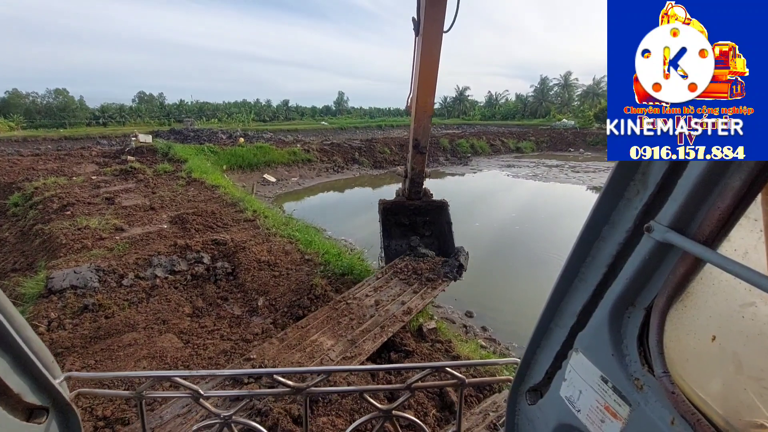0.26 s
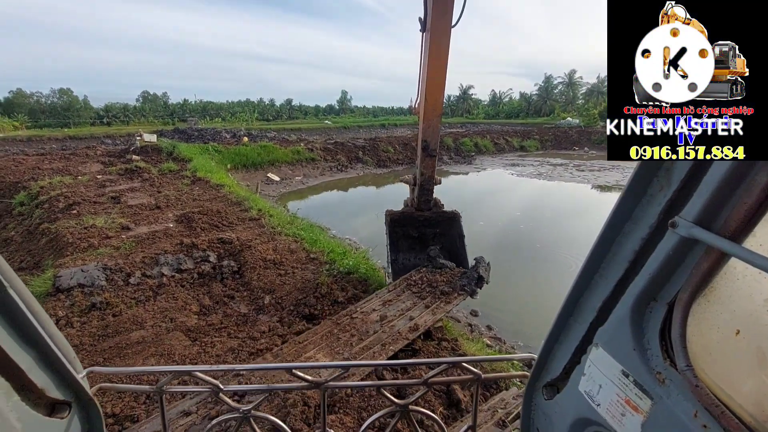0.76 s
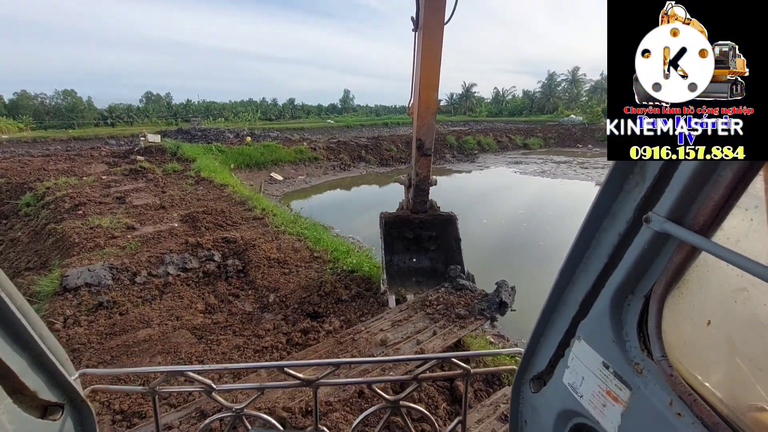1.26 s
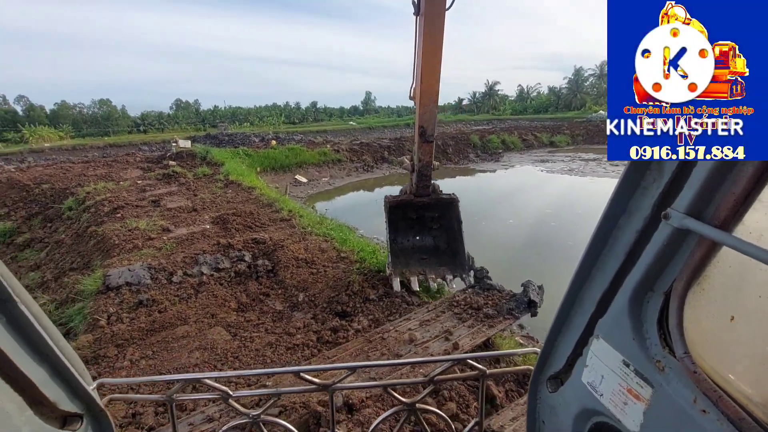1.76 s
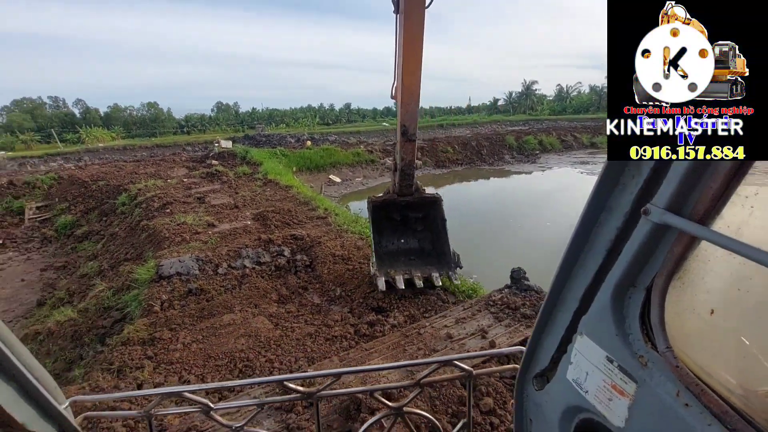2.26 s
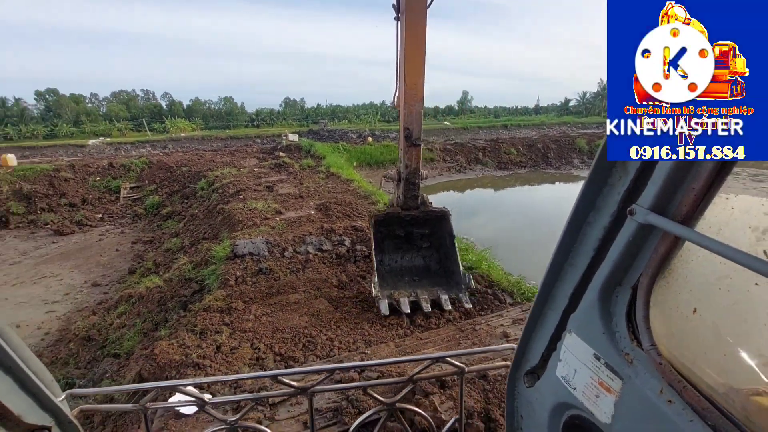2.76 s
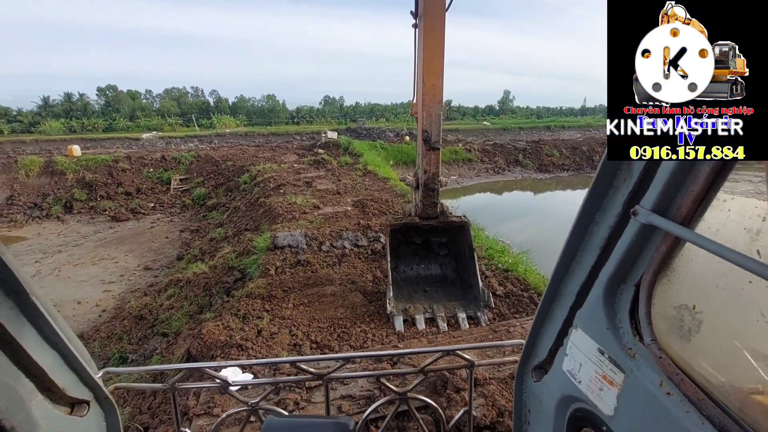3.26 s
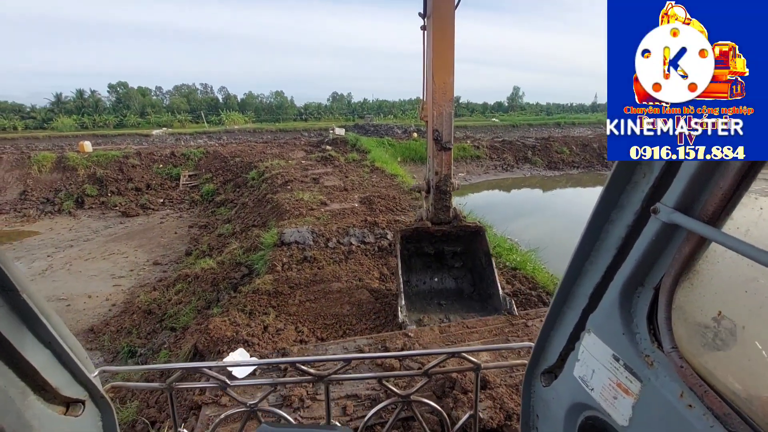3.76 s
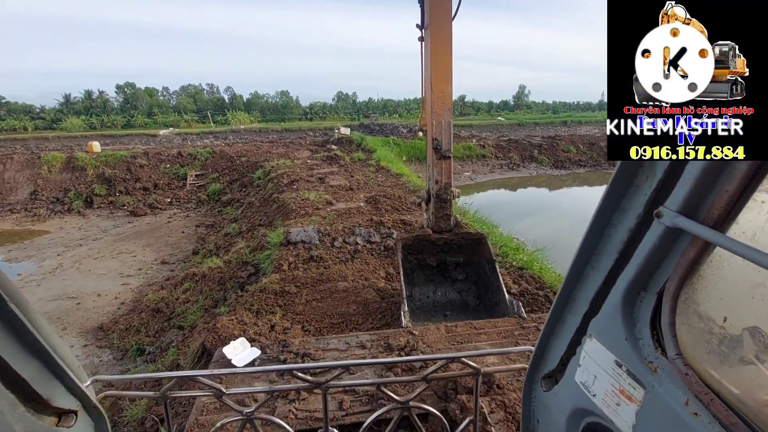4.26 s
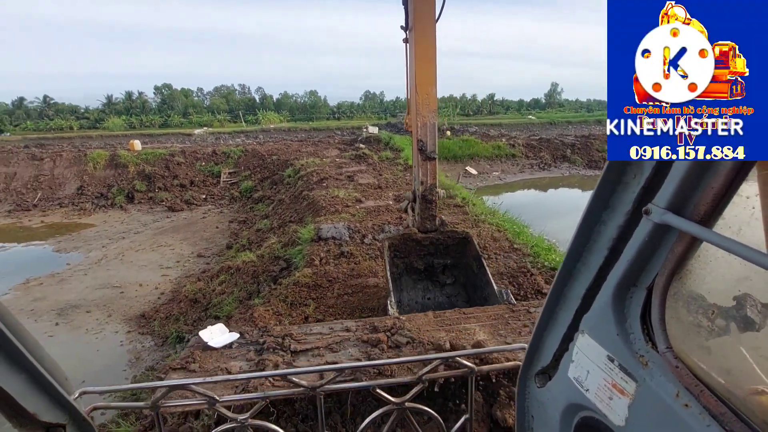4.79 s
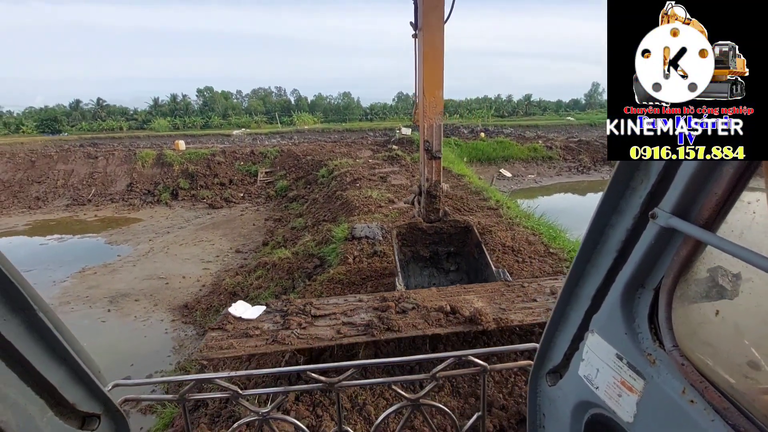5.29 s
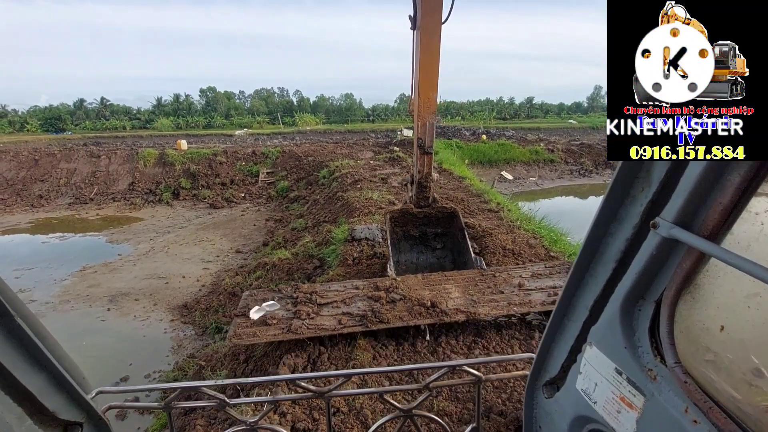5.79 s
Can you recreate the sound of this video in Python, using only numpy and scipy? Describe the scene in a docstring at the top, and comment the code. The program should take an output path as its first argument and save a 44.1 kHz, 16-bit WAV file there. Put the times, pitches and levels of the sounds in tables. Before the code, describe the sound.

Heavy diesel drone and shaking cab panels, with irregular clanks and thuds of bucket and timber, loose metal chatter, gliding hydraulic whine and oil hiss.

```python
"""A labouring diesel behind the seat of an open excavator cab: a sum of wavering crank-order tones with clatter.
The machine shifts a timber mat over wet mud and sets its bucket down. Shaped random impulses shake frame, air
and panels, swelling tones boom at each lurch, and loose fittings ring. Bucket, pins and timber knock as filtered
noise with decaying steel modes; the bucket scrapes and a pin squeaks. Gliding tones are the hydraulic drives,
shaped noise the oil in its valves."""
import sys
import numpy as np
from scipy import signal
from scipy.fft import rfft, irfft
from scipy.io import wavfile
from scipy.ndimage import uniform_filter1d

SR = 44100
rng = np.random.default_rng(int(sys.argv[2]) if len(sys.argv) > 2 else 0)


def put_to_file(sound):
    """Save the sound as 16-bit audio at rate SR, in the file named by the first command-line argument."""
    columns = np.atleast_2d(sound).T  # one column per channel
    safe = np.clip(columns, -1, 1)
    whole_steps = np.round(safe * 32767)
    wavfile.write(sys.argv[1], SR, whole_steps.astype(np.int16))


N = 265923
TIME = np.arange(N) / SR
FREQS = np.maximum(np.fft.rfftfreq(N, 1 / SR), 1)


def from_db(db):
    """Logarithmic level: decibels to amplitude gain."""
    return 10 ** (np.asarray(db) / 20)


def rms_one(x):
    """Normalisation: scale to unit power."""
    return x / np.sqrt(np.mean(x ** 2) + 1e-20)


def in_time(rows):
    """Linear interpolation: each column of a time curve at every sample."""
    s, *columns = np.transpose(rows)
    return [np.interp(TIME, s, c) for c in columns]


def colour(x, points):
    """Spectral weighting: apply the gains of a (frequency_hz, level_db) table."""
    hz, db = np.transpose(points)
    gain = from_db(np.interp(np.log(FREQS), np.log(hz), db))
    return irfft(rfft(x) * gain, N)


def shaped(x, points):
    """Source-filter principle: colour a broadband drive, with steep skirts beyond the table; unit power."""
    low_hz, high_hz = points[0][0], points[-1][0]
    outside = np.maximum(np.maximum(low_hz / FREQS, FREQS / high_hz), 1)
    return rms_one(irfft(rfft(colour(x, points)) / outside ** 4, N))


def band(x, hz, kind, order=2):
    """Causal filtering with a Butterworth response."""
    return signal.sosfilt(signal.butter(order, hz, kind, fs=SR, output="sos"), x)


def drift(rate_hz):
    """Random modulation: low-passed noise of unit power."""
    return rms_one(irfft(rfft(rng.standard_normal(N)) / (1 + (FREQS / rate_hz) ** 2), N))


def evened(x, span_s):
    """Envelope flattening: take the slow swells out of a noise."""
    return x / np.sqrt(uniform_filter1d(x ** 2, int(span_s * SR)) + 1e-6)


def swell_at(s, rise_s, fall_s):
    """Gaussian envelope: one swell, with separate widths before and after its peak."""
    return np.exp(-.5 * ((TIME - s) / np.where(TIME < s, rise_s, fall_s)) ** 2)


def contacts(per_s, spread_db):
    """Random impact process: clicks of uneven size and either sign; unit power."""
    sizes = from_db(spread_db * np.minimum(rng.exponential(1, N), 3)) * rng.choice([-1, 1], N)
    return rms_one(sizes * (rng.random(N) < per_s / SR))


# engine orders: crank_multiple, level_db
CRANK_ORDERS = [(1, -57), (2, -36), (5, -37.5), (7, -39.5), (8, -38), (9, -44.5), (10, -53), (11, -48),
                (12, -45), (14, -71), (16, -46), (18, -45), (20, -48)]
# order that swells in a resonance: crank_multiple, level_db (on resonance at 0 dB effort), resonance_hz,
# width_hz, follows (dB per dB of effort)
SWELLING_ORDERS = [(4, -25, 133, 10.7, 1.05)]
THROB_DB, THROB_HZ = 2.3, 7   # spread and rate of the level throb


def diesel(speed, turns, effort_db):
    """Harmonic excitation: crank orders waver and throb with uneven combustion; one swells in the cab's resonance."""
    out, hunting_turns = 0, .012 * drift(4)
    swollen = []
    for order, db, hz, width, follows in SWELLING_ORDERS:
        detuning = 2 * (order * speed - hz) / width
        swollen.append((order, db + follows * effort_db - 10 * np.log10(1 + detuning ** 2)))
    throb = from_db(THROB_DB * np.minimum(drift(THROB_HZ), 1.5))
    for order, db in CRANK_ORDERS + swollen:
        phase_turns = round(order) * (turns + hunting_turns) + rng.random()
        own_throb = np.roll(throb, rng.integers(N))
        out = out + from_db(db) * own_throb * np.sqrt(2) * np.sin(2 * np.pi * phase_turns)
    return out


# clatter and chatter spectrum: frequency_hz, level_db (per Hz, relative)
RATTLE_SPECTRUM = [(450, 5), (700, 3), (860, 2.5), (1200, -3), (1500, -3), (1900, -7.5), (2500, -14),
                   (3300, -19.5), (4500, -28.5), (6000, -38), (10000, -39.5)]
# level law: level_db (at 0 dB effort), follows (dB per dB of effort)
RATTLE_LEVEL = (-35, 1)


def rattle(turns, effort_db, clumps):
    """Amplitude modulation: combustion clatter pulses twice a turn; loose fittings chatter in clumps."""
    base_db, follows = RATTLE_LEVEL
    firing = 1 + 0.039 * np.cos(2 * np.pi * 2 * turns)
    clatter = shaped(firing * rng.standard_normal(N), RATTLE_SPECTRUM)
    chatter = shaped(clumps * rng.standard_normal(N), RATTLE_SPECTRUM)
    return from_db(base_db + follows * effort_db) * (from_db(-1.0) * clatter + from_db(-1.5) * chatter)


# spectra of frame, cab air and panels: frequency_hz, level_db (per Hz, relative)
SHAKE_SPECTRUM = [(20, -35), (30, -26), (37, 0.5), (46, 2.5), (59, 10), (73, 8.5), (85, 4.5), (105, -8),
                  (150, -55)]
BOOM_SPECTRUM = [(70, -19), (98, -6), (116, -3.5), (134, 4.5), (148, -3.5), (166, -4), (195, -14.5),
                 (260, -17)]
PANEL_SPECTRUM = [(150, -36), (200, 3.5), (232, 8.5), (262, 4), (288, -1.5), (335, -2), (385, -1),
                  (480, -9), (600, -5), (720, -17), (1100, -23.5)]
# their level laws: level_db (at 0 dB effort), follows (dB per dB of effort)
SHAKE_LEVEL = (-26.5, 1)
BOOM_LEVEL = (-21.5, 0.89)
PANEL_LEVEL = (-26, 1.0)


def structure(effort_db):
    """Forced vibration: jolts from tracks and arm shake the frame, cab air and panels, harder with effort."""
    out = 0
    for spectrum, (base_db, follows), per_s, spread_db, span_s in [
            (SHAKE_SPECTRUM, SHAKE_LEVEL, 500, 7.1, 0.1),
            (BOOM_SPECTRUM, BOOM_LEVEL, 600, 3.8, 0.061),
            (PANEL_SPECTRUM, PANEL_LEVEL, 600, 2.2, 0.084)]:
        vibration = evened(shaped(contacts(per_s, spread_db), spectrum), span_s)
        out = out + from_db(base_db + follows * effort_db) * vibration
    return out


# lurches of the machine: start_s (peak of the swell), level_db, pitch_hz, width_s (Gaussian)
LURCH_EVENTS = [(0.07, -14, 121, 0.027), (0.297, -10, 74.9, 0.051), (0.339, -3, 134.4, 0.015),
                (0.42, -3, 135, 0.01), (1.153, -10, 321, 0.0076), (1.235, -19, 288, 0.048),
                (.8, -20.5, 74, 0.15), (1.212, -12, 75.3, 0.03), (1.192, -6.5, 150, 0.0049),
                (1.386, -9, 130, 0.0081), (1.411, -4.5, 131, 0.0077), (1.464, -14.5, 130, 0.033),
                (2.653, -11, 75, 0.023), (2.73, -18, 270.6, 0.033), (3.005, -16.5, 305, 0.026),
                (2.8, -11, 75.3, 0.036), (3.04, -10.5, 234.1, 0.023), (4.093, -20.5, 76, 0.064),
                (3.153, -10, 71.8, 0.039), (3.305, -14, 67.7, 0.042), (3.37, -3.5, 135, 0.0083),
                (3.461, 1, 122.9, 0.0072), (4.986, -8.5, 126.6, 0.023), (5.288, -5.5, 137.5, 0.028),
                (5.43, -9, 138.8, 0.056), (5.673, -11.5, 136, 0.041)]
LURCH_WAVER_HZ = 7.82   # rms pitch deviation


def lurches():
    """Transient resonance: at each lurch one wavering cab tone swells and fades."""
    out, waver_turns = 0, LURCH_WAVER_HZ * np.cumsum(drift(19.4)) / SR
    for s, db, hz, width in LURCH_EVENTS:
        tone = np.sin(2 * np.pi * (hz * TIME + waver_turns + rng.random()))
        out = out + from_db(db) * swell_at(s, width, width) * tone
    return out


# nominal range of the fittings: lowest_hz, highest_hz
FITTING_RANGE = (255.1, 1732.5)
# level law: level_db (at 0 dB effort), follows (dB per dB of effort)
FITTING_LEVEL = (-31, 1.1)
FITTING_HITS_PER_S, FITTING_SPREAD_DB = 9, 1.3   # for each fitting
FITTING_CYCLES, FITTING_FALL_DB = 100, -5.5   # cycles to decay 60 dB; level per octave


def fittings(effort_db, count=16):
    """Damped resonators: guard rails, latches and trim, jolted at random, each ring at their own pitch."""
    out = 0
    base_db, follows = FITTING_LEVEL
    for hz in np.geomspace(*FITTING_RANGE, count) * rng.uniform(.96, 1.04, count):
        w, r = 2 * np.pi * hz / SR, from_db(-60 * hz / (FITTING_CYCLES * SR))
        hits = contacts(FITTING_HITS_PER_S, FITTING_SPREAD_DB) + 1e-12 * np.cos(TIME)
        ring = signal.lfilter([np.sin(w), -np.sin(w)], [1, -2 * r * np.cos(w), r * r], hits)
        out = out + from_db(FITTING_FALL_DB * np.log2(hz / FITTING_RANGE[0])) * rms_one(ring)
    return from_db(base_db + follows * effort_db) * rms_one(out)


# noise bands of a knock: low_hz, high_hz, t60_s (times the blow's length factor), swell_s, level_db (trim)
BLOW_BANDS = [(80.5, 250, 0.35, 0.0036, 4), (239, 448, 0.16, 0.00072, 1), (700, 1293, 0.23, 0.00017, 1),
              (1320, 2410, 0.26, 0.00023, 5.5), (2850, 5240, 0.23, 0.00028, 7.5)]
# steel modes of bucket and arm: pitch_hz (nominal), level_db (relative), t60_s
STEEL_MODES = [(378.5, -13, 0.39), (439.3, -3.5, 0.25), (509, -7, 0.32), (585.5, -5.5, 0.1),
               (791, -14, 0.29), (883, -8, 0.36), (1027.4, -1.5, 0.095), (1112, -9.5, 0.14),
               (1295, -19.5, 0.41), (1716, -2, 0.18), (1900, 1, 0.1), (1960, -5, 0.18), (2310, -14, .16),
               (3183, -2, 0.08)]
STEEL_SHIFT = 0.019   # the load of mud detunes the modes from blow to blow (share of pitch)
STEEL_SPREAD_DB = 4.5   # each blow lands on another spot and favours other modes
STRIKE_DB = -5.5   # the first hard contact, against the crunch that follows


def knock(levels_db, length, contact_s, grit):
    """Impact and modal decay: a sharp strike, a crunch gritty above the bass, and the ring of the steel."""
    t, out = TIME[:len(grit)], 0
    for (low, high, t60, swell, trim_db), db in zip(BLOW_BANDS, levels_db):
        noise = band(rng.standard_normal(SR // 2), [low, high], "band", order=3)
        crunch = evened(noise, 3 / (high - low) + 0.0021)[-len(t):]
        if low > 600:
            crunch = crunch * grit
        strike = band(1. * (t == 0) + 1e-18 * crunch, [low, high], "band")
        strike = rng.choice([-1, 1]) * from_db(STRIKE_DB) * strike / np.abs(strike).max()
        decay = from_db(db + trim_db - 60 * t / (t60 * length))
        out = out + (strike + crunch) * decay * (1 - np.exp(-t / swell))
    # the finest grit adds a brief sizzle
    sizzle = rms_one(band(rng.standard_normal(len(t)), [6000, 9000], "band"))
    out = out + sizzle * from_db(levels_db[-1] - 3.5 - 60 * t / 0.19)
    centres_hz = [np.sqrt(low * high) for low, high, *_ in BLOW_BANDS]
    for hz, db, t60 in STEEL_MODES:
        spot, load = rng.uniform(-1, 1, 2)
        strength_db = np.interp(hz, centres_hz, levels_db) + db + STEEL_SPREAD_DB * spot
        tone = np.sin(2 * np.pi * hz * (1 + STEEL_SHIFT * load) * t)
        out = out + rng.choice([-1, 1]) * from_db(strength_db - 60 * t / t60) * tone
    return out * (1 - np.exp(-t / contact_s))   # mud cushions a blow and slows its attack


# knocks of bucket, pins and timber: start_s, level_db, bass_db (added to the two lowest bands),
# tilt_db (per octave from 1 kHz, other bands), contact_s (0.1 ms at least), length (factor on band t60)
BLOWS = [(.193, -21.5, -1, -9, 0.0019, 1), (0.279, -24, -4, -9, 0.00079, 0.54),
         (.325, -23, 9.5, -15, 0.00039, 0.21), (0.391, -19, -0.5, -5, 0.0012, 0.86),
         (0.503, -33, -5, -4, 0.0025, 2.2), (.548, -35, -14, 7.5, .0017, 0.27),
         (0.663, -37, 16.5, -15, 0.00083, 0.48), (.989, -30, 2.5, 0.5, 0.0016, 0.53),
         (1.039, -27.5, 9, -26, 0.00074, 0.4), (1.138, -17, 3, 2, 0.0018, 0.44),
         (1.148, -22, 0.5, -7, 0.0007, 0.99), (1.186, -33.5, 5, -3, .002, 0.6),
         (1.213, -28.5, 7, 3.5, 0.0022, 0.65), (1.249, -33, 10.5, -9, 0.0013, 0.85),
         (1.3637, -15, -0.5, -11, 0.00029, 0.51), (1.3952, -24, 4, -2, .00015, 0.37),
         (1.419, -37.5, 18, 8, .0023, 0.73), (1.487, -38, 6, -22, .0003, 0.58),
         (1.522, -34, 8, -10, 0.0019, 0.71), (1.699, -29.5, 11.5, 1, 0.0016, 0.14),
         (1.728, -29.5, 1, 0.5, 0.0017, 0.51), (1.851, -24, -2, 1, 0.0065, 0.66),
         (1.941, -29, -20, 1, .0021, 0.43), (1.989, -22.5, 1, -1.5, .0024, 0.31),
         (2.025, -30.5, -4, -2, 0.0026, 1.2), (2.108, -33.5, -3, -2, 0.007, 2.5),
         (2.305, -23.5, 2.5, -1, 0.0069, 0.63), (2.41, -35, -16, 4.5, 0.0018, 0.41),
         (2.468, -39.5, 8, 7, 0.0037, 0.86), (2.602, -27, -9, -1, .001, 0.29),
         (2.725, -28.5, 10.5, -17, 0.0029, 1.2), (2.811, -30, 5, -14, .004, 0.86),
         (2.926, -35.5, 20, 6, 0.00078, 0.37), (2.978, -26.5, 9.5, -9, 0.0015, 1.2),
         (2.994, -23, 3, 5, 0.00089, 0.5), (3.109, -28.5, 10.5, -0.5, 0.00068, 0.41),
         (3.337, -35.5, -5, 9, 0.00084, 0.3), (3.363, -24, 0, -3, 0.0028, 0.7),
         (3.449, -24.5, 1.5, -24, 0.00055, 0.78), (3.464, -21.5, 4, 0, 0.0005, 0.32),
         (3.494, -28.5, 10.5, -13, 0.0013, 0.51), (3.543, -27.5, 0.5, -7, .002, 1.7),
         (3.593, -28.5, -5, -10, 0.0016, 0.89), (3.829, -28, 8, -8, 0.00069, .6),
         (3.864, -26, 3.5, -13, 0.0044, 0.78), (3.909, -27, -3, -17, .0005, .5),
         (4.31, -32.5, 2, 0, 0.0059, 0.98), (4.852, -25.5, 7.5, -3.5, 0.003, 1),
         (5.078, -35, 16.5, -13, 0.0017, 0.5), (5.115, -23, 2.5, -11, .005, 1),
         (5.472, -23.5, 6, -10, 0.0039, 3), (5.589, -20.5, 4, -22, 0.0027, 0.72),
         (5.619, -18, 8.5, -15, .0007, 0.32)]
# thud, body, clank, crack and grit of a plain blow: level_db (relative)
BLOW_SHAPE = [1.5, 4, -1, -9.5, -26]


def knocks(grit):
    """Spectral balance of impact: a heavy blow has more thud, a steely one more treble."""
    out = np.zeros(N + SR)
    octaves = np.log2([np.sqrt(low * high) / 1000 for low, high, *_ in BLOW_BANDS])
    for s, db, bass_db, tilt_db, contact_s, length in BLOWS:
        balance_db = np.where(octaves < -.5, bass_db, tilt_db * octaves)
        levels_db = db + np.array(BLOW_SHAPE) + balance_db
        at = int(s * SR)
        blow = knock(levels_db, length, max(contact_s, 1e-4), grit[at:at + SR * 2 // 5])
        out[at:at + len(blow)] += blow
    return out[:N]


# single struck parts: start_s, level_db, pitch_hz, t60_s
STRUCK_PARTS = [(0.399, -13, 459, .2), (.402, -23, 905, .2), (.555, -17.5, 2004, 0.11),
                (1.146, -6, 445, 0.1), (1.211, -22, 2250, .05), (1.372, -11, 440, .16),
                (1.42, -24, 1750, .07), (1.425, -54, 8200, 0.54), (2.998, -11, 368, 0.24),
                (3.338, -17, 2400, 0.03), (3.468, -19, 440, 0.27), (4.853, -25, 1030, 0.11),
                (5.305, -23, 1670, 0.18), (5.61, -12.5, 851, 0.085), (.3265, -12, 1050, .025),
                (1.141, -20, 1653, .13), (1.141, -29, 3273, .11), (1.143, -37, 4904, .13),
                (1.149, -13, 2008, .14), (1.04, -14, 1050, .04), (1.04, -13, 430, .1),
                (1.3642, -6, 1080, .03), (1.3642, -8, 770, .045), (1.3955, -10, 1250, .028),
                (1.3955, -12, 720, .04), (1.486, -23, 1050, .04), (2.312, -23, 875, .16),
                (2.994, -29, 4689, .08), (2.994, -20, 2550, .04), (3.4495, -12, 900, .03),
                (3.4495, -13, 500, .06), (3.464, -24, 3100, .04), (3.465, -13, 1150, .035),
                (3.909, -22, 950, .04), (5.591, -12, 640, .09), (5.6, -14, 1150, .06),
                (5.619, -7, 465, .07)]


def clinks():
    """Free vibration: each struck part rings as one decaying tone."""
    out, t = np.zeros(N + SR), TIME[:SR // 2]
    for s, db, hz, t60 in STRUCK_PARTS:
        at = int(s * SR)
        out[at:at + len(t)] += from_db(db - 60 * t / t60) * np.sin(2 * np.pi * hz * t)
    return out[:N]


# bucket dragging over timber: start_s, level_db
SCRAPE_LEVEL = [(1.62, -53), (1.72, -30), (1.82, -42), (1.88, -42), (1.96, -39), (2.05, -41), (2.18, -38),
                (2.27, -56), (2.33, -34), (2.45, -54), (2.55, -75)]
SLIPS_PER_S, SLIP_SPREAD_DB, SCRAPE_DULL_HZ = 70, 3, 1300   # the last is the low-pass corner of the ticks


def scrape():
    """Stick-slip friction: steel on wet wood gives uneven, dull ticks, each ringing the bucket's modes."""
    t, ring = TIME[:SR // 2], 0
    for hz, db, t60 in STEEL_MODES:
        mode = from_db(db - 60 * t / t60) * np.sin(2 * np.pi * hz * t)
        ring = ring + rng.choice([-1, 1]) * mode
    slips = band(contacts(SLIPS_PER_S, SLIP_SPREAD_DB), SCRAPE_DULL_HZ, "low", order=3)
    return from_db(in_time(SCRAPE_LEVEL)[0]) * rms_one(signal.fftconvolve(slips, ring)[:N])


# slip of a dry pin: start_s (peak of the swell), level_db, pitch_hz (mean), rise_s, fall_s (Gaussian)
PIN_SLIP = (.3965, -21.5, 920, .0026, .007)
# its partials: pitch_multiple, level_db (relative)
PIN_PARTIALS = [(1, -3), (2, 5), (3, -3), (4, -9.5)]


def squeak():
    """Stick-slip oscillation: a dry pin squeaks hoarsely for milliseconds, a short stack of rough partials."""
    s, db, hz, rise, fall = PIN_SLIP
    phase = 2 * np.pi * np.cumsum(hz * (1 + .1 * drift(300))) / SR
    partials = sum(from_db(partial_db) * np.sin(round(k) * phase) for k, partial_db in PIN_PARTIALS)
    return from_db(db) * swell_at(s, rise, fall) * partials


# hums of the hydraulic drives, one list for each: start_s, pitch_hz, level_db
DRIVE_GLIDES = [
    [(0, 254, -24), (.2, 260, -25), (.4, 256, -38), (.6, 262, -33), (.8, 260, -27), (1.0, 254, -30),
     (1.15, 250, -50)],
    [(3.45, 428, -48), (3.65, 432, -34), (3.9, 412, -35), (4.1, 405, -33), (4.25, 362, -39),
     (4.38, 350, -36), (4.6, 368, -37), (4.9, 398, -33), (5.2, 412, -30), (5.42, 419, -29), (5.6, 420, -48)],
    [(4.1, 148, -48), (4.4, 150, -32), (4.7, 163, -28), (5.0, 174, -28), (5.4, 173, -27), (5.6, 170, -45)],
    [(5.62, 236, -42), (5.78, 252, -23), (5.87, 259, -13), (6.03, 261, -13.5)],
]
HUM_WAVER_DB, HUM_WAVER_TURNS = 1, .025   # spread of level and of phase


def hums():
    """Frequency modulation: each hydraulic drive sings one gliding note, unsteady in level and pitch."""
    out, unsteady, waver_turns = 0, from_db(HUM_WAVER_DB * drift(14)), HUM_WAVER_TURNS * drift(12)
    for glide in DRIVE_GLIDES:
        hz, db = in_time(glide)
        outside_s = np.abs(TIME - np.clip(TIME, glide[0][0], glide[-1][0]))
        tone = np.sqrt(2) * np.sin(2 * np.pi * (np.cumsum(hz) / SR + waver_turns))
        out = out + from_db(db - 300 * outside_s) * tone
    return unsteady * out


# oil flow through the valves: start_s, level_db (before HISS_DB)
OIL_FLOW = [(0, -47), (.15, -44), (.43, -54.5), (.8, -48.5), (.95, -54), (1.2, -50), (1.55, -59),
            (1.85, -58.5), (2.16, -53), (2.25, -58), (2.5, -54), (2.8, -46.5), (3.0, -48), (3.25, -51.5),
            (3.62, -64), (4.05, -51), (4.25, -55.5), (4.74, -56), (5.0, -50), (5.45, -46.5), (5.7, -47),
            (6.03, -44)]
# spectra of flow hiss, spurts and the singing boom valve: frequency_hz, level_db (per Hz, relative)
HISS_SPECTRUM = [(2500, 9), (4500, 4), (5800, 0), (7400, 0), (9300, -1.5), (11000, -0.5), (12300, 2),
                 (13500, -1.5), (15500, -22)]
JET_SPECTRUM = [(3500, -19), (5800, -8), (7300, 0), (9300, -3.5), (11000, 2), (12200, 8), (13500, 1),
                (15500, -16)]
SING_SPECTRUM = [(2900, -15), (3300, -5), (3500, -8), (3900, -16)]
# valve spurts: start_s (peak of the swell), level_db (before the jet's trim), rise_s, fall_s (Gaussian)
VALVE_SPURTS = [(1.0, -35.5, .0044, 0.0049), (1.22, -46, 0.0073, .015), (1.345, -44, 0.0068, 0.034),
                (2.36, -42, 0.019, 0.084), (3.27, -37.5, 0.02, 0.043), (4.09, -46, 0.025, 0.035),
                (4.902, -40, .003, .006), (5.25, -29.5, 0.0085, 0.03), (5.41, -36, 0.046, 0.045),
                (5.85, -43, 0.058, 0.034)]
# brief singing of the boom valve: start_s, level_db
SING_LEVEL = [(3.75, -74), (3.87, -52), (4.05, -50), (4.15, -50), (4.25, -75)]
# whistle of an opening valve: start_s, pitch_hz, level_db
VALVE_WHISTLE = [(4.45, 4400, -89), (4.5, 4680, -48), (4.55, 5930, -49), (4.6, 6580, -80)]
HISS_DB = 0.34   # relative to the flow


def hydraulics():
    """Turbulent flow noise: oil hisses with the flow, spurts as spools move and whistles through narrow gaps."""
    flutter = from_db(1.8 * drift(12))
    flow_db = in_time(OIL_FLOW)[0]
    hiss = from_db(flow_db + HISS_DB) * flutter * shaped(rng.standard_normal(N), HISS_SPECTRUM)
    opening = sum(from_db(db) * swell_at(s, rise, fall) for s, db, rise, fall in VALVE_SPURTS)
    jet = from_db(-4.5) * opening * shaped(rng.standard_normal(N), JET_SPECTRUM)
    sing = from_db(in_time(SING_LEVEL)[0]) * shaped(rng.standard_normal(N), SING_SPECTRUM)
    hz, db = in_time(VALVE_WHISTLE)
    phase = 2 * np.pi * np.cumsum(hz) / SR
    # turbulence makes the whistle hoarse
    whistle = drift(450) * np.sin(phase) + 0.52 * drift(800) * np.sin(2 * phase)
    return hiss + jet + sing + from_db(db) * whistle


# resonances and nulls of cab and panels: pitch_hz, width_hz, level_db
CAB_RESONANCES = [(71, 6, -1.5), (209, 67, -1.5), (288, 9.5, 5.5), (380, 24, -0.5), (387, 9.8, 4),
                  (572.4, 9.4, 3.5), (720, 27, -1), (837.5, 8.9, 6), (1150, 20, 0), (1220, 29, 1),
                  (1560, 57, -1.5), (1596, 74, 3), (2940, 52, 1.5)]
# reflections off the nearest panes: delay_s, level_db (reached in the treble)
PANE_ECHOES = [(.0029, -20), (.0061, -12.5), (0.0126, -14.5)]
# sound scattered off glass and steel: frequency_hz, level_db
SCATTER_LEVEL = [(60, -51), (130, -14.5), (280, -11), (500, -10), (900, -2), (2000, 0.5), (5000, -2),
                 (12000, -3)]
# left minus right: frequency_hz, level_db
SIDE_TILT = [(60, -5), (120, -1), (220, -5.5), (400, -0.5), (690, -0.5), (1280, -6), (2200, -7.5),
             (4200, 0.5), (7500, 1.5), (12000, -3.5)]
LEFT_LAG_S = 0.0002675   # reached in the treble


def cab(direct, scattered):
    """Room acoustics: bass fills the cab evenly; diffuse treble bounces off glass and reaches the right first."""
    modes = from_db(sum(db / (1 + (2 * (FREQS - hz) / width) ** 2) for hz, width, db in CAB_RESONANCES))
    glass = sum(from_db(db) * np.exp(-2j * np.pi * FREQS * delay) for delay, db in PANE_ECHOES)
    response = modes * (1 + glass / (1 + (1300 / FREQS) ** 2))
    side = colour(scattered, SCATTER_LEVEL)
    lag_s = LEFT_LAG_S / (1 + (800 / FREQS) ** 2)
    left = irfft(rfft(direct + side) * response * np.exp(-2j * np.pi * FREQS * lag_s), N)
    right = irfft(rfft(direct - side) * response, N)
    left = colour(left, [(hz, db / 2) for hz, db in SIDE_TILT])
    right = colour(right, [(hz, -db / 2) for hz, db in SIDE_TILT])
    return np.array([left, right])


# engine speed: start_s, speed_hz (crank turns per second)
ENGINE_SPEED = [(0, 32.9), (1.0, 34), (1.3, 33.3), (1.7, 37.2), (2.2, 37.2), (2.8, 33.8), (3.2, 33.4),
                (3.7, 34.2), (4.3, 35.9), (4.9, 33.9), (5.3, 34.5), (5.6, 33.1), (5.85, 32.35),
                (6.03, 32.4)]
# strain on the machine: start_s, effort_db
STRAIN = [(0, 7), (.12, 7), (.3, 3), (.48, -1), (.92, -4), (1.27, 2.5), (1.45, -6), (1.6, -9), (1.8, -6),
          (2.03, -1.5), (2.26, -5), (2.36, -2), (2.53, 0), (2.749, 5), (3.02, 4.5), (3.5, 2.5), (3.72, -5),
          (3.95, 0), (4.27, -4.5), (4.7, -0.5), (5.0, 4), (5.35, 6.5), (5.74, 4), (6.03, 7.5)]


def scene():
    """Superposition: all sources add up at the driver's seat."""
    speed, effort_db = in_time(ENGINE_SPEED)[0], in_time(STRAIN)[0]
    turns = np.cumsum(speed) / SR
    # the power of each touch of a loose fitting decays with a time constant of 8.6 ms
    touches = contacts(130, 2.2) ** 2 + 1e-9
    clumps = np.sqrt(signal.lfilter([1], [1, -np.exp(-1 / (0.0086 * SR))], touches))
    grit = rms_one(from_db(1.8 * np.minimum(drift(300), 2)))   # 1.8 dB spread, 300 Hz rate
    # two independent draws of the spread-out sources: direct and scattered
    direct, scattered = [rattle(turns, effort_db, clumps) + structure(effort_db) + fittings(effort_db)
                         + knocks(grit) + scrape() + squeak() + hydraulics() for path in range(2)]
    tones = diesel(speed, turns, effort_db) + lurches() + clinks() + hums()
    return cab(direct + tones, scattered)


def record(dry):
    """Band limiting and soft saturation: deep rumble is filtered out, loud peaks rounded, the top cut."""
    lean = band(dry, 43.0, "high", order=3)
    rounded = lean / (1 + lean ** 6) ** (1 / 6)
    return signal.sosfilt(signal.ellip(10, .1, 90, 15450, fs=SR, output="sos"), rounded)


dry = scene()
out = record(dry)
put_to_file(out)
```